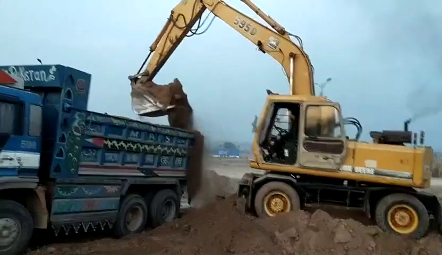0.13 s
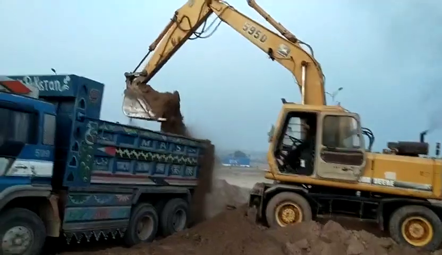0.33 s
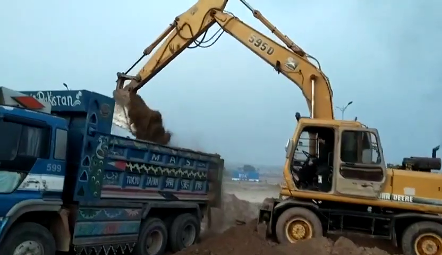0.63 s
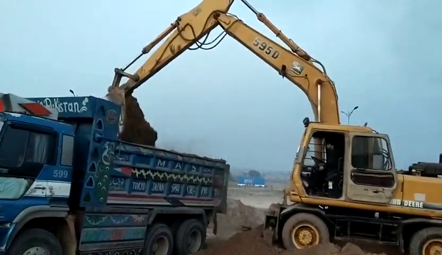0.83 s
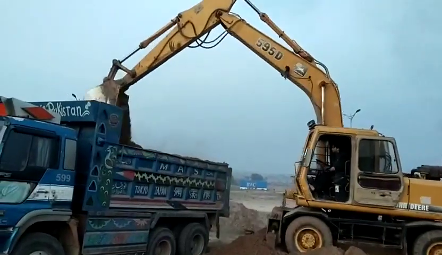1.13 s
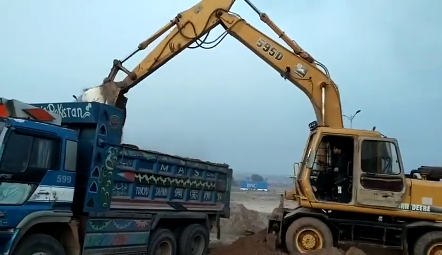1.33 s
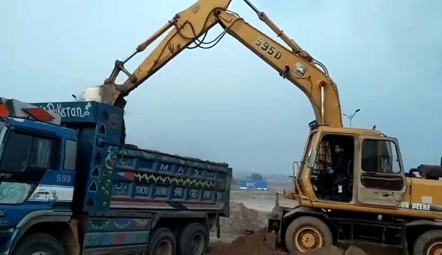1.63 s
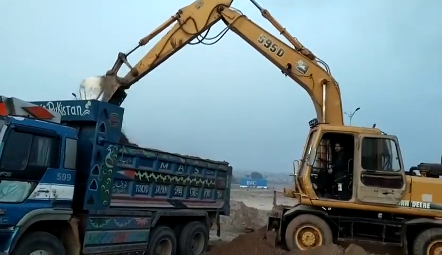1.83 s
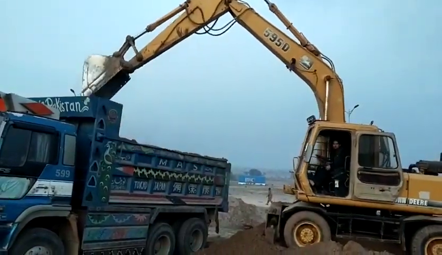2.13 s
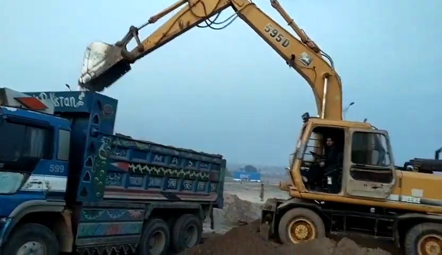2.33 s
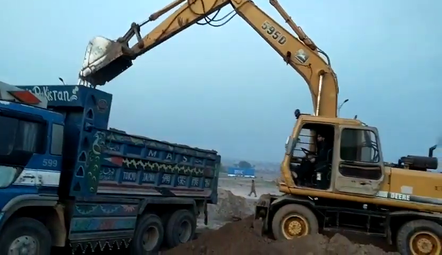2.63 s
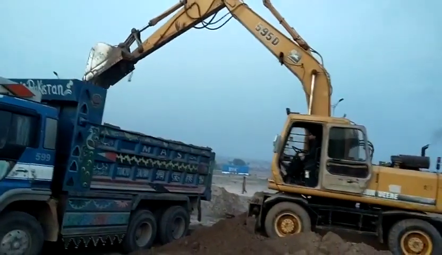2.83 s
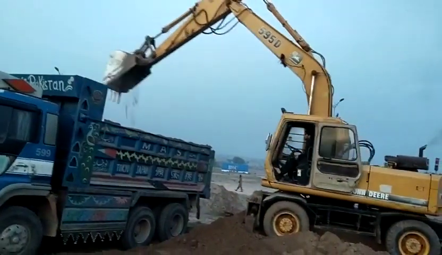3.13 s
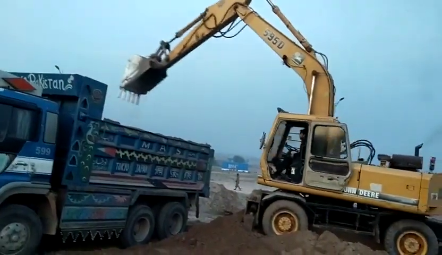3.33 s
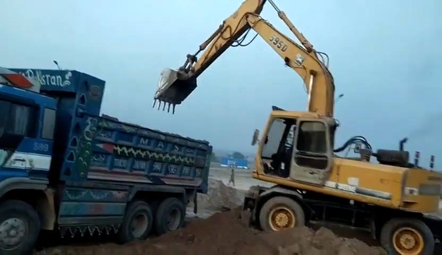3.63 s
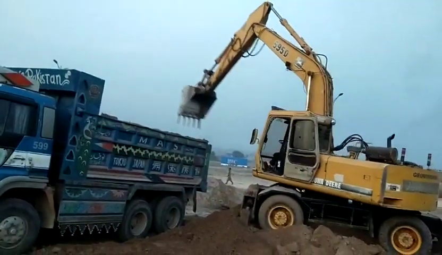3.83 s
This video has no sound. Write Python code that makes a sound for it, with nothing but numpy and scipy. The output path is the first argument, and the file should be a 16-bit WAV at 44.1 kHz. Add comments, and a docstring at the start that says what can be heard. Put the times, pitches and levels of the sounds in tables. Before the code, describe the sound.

A loud excavator diesel roars outdoors, close to the microphone, while soil patters down, the steel bucket clanks and clods thud into a truck bed; then the engine eases and faint hydraulic whines follow the swinging boom.

```python
"""Excavator loading a truck

A diesel engine is heard as harmonics of its firing rate under roar, clatter and hiss that pulse with it.
Soil patters as a random stream of short knocks; the steel bucket clanks and clods thump into the truck
bed, each a sum of decaying modes with a burst of noise. The boom then swings away with a two-partial
hydraulic hum and thin gliding whines. The sound opens with a quick fade-in, in two channels."""
import sys
import numpy as np
from scipy import signal
from scipy.fft import rfft, irfft
from scipy.io import wavfile
from scipy.ndimage import uniform_filter1d

SR = 44100
rng = np.random.default_rng(int(sys.argv[2]) if len(sys.argv) > 2 else 0)


def generate_wav(sig):
    """Save sig (samples, or channels by samples) to the path in sys.argv[1] as 16-bit PCM at SR."""
    pcm = np.round(np.clip(np.atleast_2d(sig).T, -1, 1) * 32767).astype(np.int16)
    wavfile.write(sys.argv[1], SR, pcm)


N = 176400
T = np.arange(N) / SR
HZ = np.fft.rfftfreq(N, 1 / SR)

# Source levels are nominal, ahead of the channel balance and opening gain.
# Colours are relative spectral densities.

# engine firing rate before jitter: t/s, f/Hz
FIRING_RATE = [(.4, 90), (.97, 89), (1.07, 89.6), (2.5, 90.3), (3.6, 89.8), (3.7, 93)]
# exhaust note: t/s, level/dB
EXHAUST = [(.42, -26.5), (.57, -26), (1.0, -25), (1.07, -28), (1.13, -30.5), (1.6, -31), (2.5, -33.5),
           (2.85, -37), (3.25, -37.5), (3.64, -42.5), (3.82, -35.5)]
# exhaust partials: multiple of the firing rate, level/dB
ORDERS = [(1, -0.5), (2, -4), (2.5, -22), (3, -15.5), (3.5, -17.5), (4, -13), (4.5, -25)]
# engine noise: t/s, low roar level/dB, midrange clatter level/dB, treble hiss level/dB
ENGINE_NOISE = [(.43, -26, -28.5, -39.5), (.6, -24, -25.5, -35), (.9, -28, -27, -36),
                (1.09, -28.5, -30.5, -39), (1.14, -30.5, -32.5, -46), (1.35, -32.5, -34.5, -46.5),
                (1.65, -31, -36.5, -47), (2.03, -33, -34, -43.5), (2.25, -34.5, -35.5, -45.5),
                (2.5, -36, -33, -41.5), (2.78, -34.5, -34.5, -44.5), (3.1, -35, -33, -44.5),
                (3.45, -35.5, -33.5, -43), (3.7, -32.5, -32, -43.5), (4, -34, -33, -43)]
# colours of these three noises: f/Hz, level/dB
ROAR_COLOUR = [(20, -21), (42, -26), (62, -10.5), (105, -9.5), (145, -2), (195, 0.5), (250, -4), (300, 1),
               (400, -3.5), (480, -8.5), (700, -14.5), (1500, -41)]
CLATTER_COLOUR = [(150, -52), (400, -17), (600, 0.5), (700, -4), (830, 1), (1100, -2), (1550, -0.5),
                  (2200, -8.5), (2800, -10), (3400, -14.5), (5000, -24), (9000, -46.5)]
HISS_COLOUR = [(1500, -3), (3300, -2), (4400, 1.5), (5700, -2.5), (6300, 4.5), (6900, 4.5), (7700, -4),
               (8700, -7), (12000, -5.5), (15000, -1.5), (16000, -12)]
# relative strength of the firing pulse in roar, clatter, hiss [no unit]
PULSING = [0.16, 0.045, 0.082]
# hydraulic pump hum: t/s, f/Hz, fundamental level/dB, octave level/dB
PUMP = [(1.33, 198, -44, -57.5), (1.55, 199.6, -38.5, -44.5), (1.8, 202, -36.5, -38),
        (2.2, 199.3, -38.5, -58), (2.8, 200, -69, -57), (3.3, 199.5, -67, -41), (3.7, 200, -38, -36.5),
        (3.8, 202, -34.5, -43), (4, 203, -30.5, -47)]
# hydraulic whines: start t/s, end t/s, starting f/Hz, final f/Hz, level/dB
WHINES = [(2.68, 2.9, 2755, 2712, -48), (2.92, 3.17, 2712, 2750, -45.5), (3.12, 3.47, 2715, 2900, -51.5),
          (3.42, 3.66, 810, 825, -45), (3.64, 3.92, 890, 915, -45)]
# sliding soil: t/s, level/dB
SOIL = [(.4, -40.5), (.6, -32.5), (.8, -32), (1.09, -33), (1.17, -42.5), (1.6, -39.5), (2.1, -64)]
# colour of the soil: f/Hz, level/dB
SOIL_COLOUR = [(130, -4), (200, 11.5), (370, 8), (700, 0.5), (1200, 1.5), (2600, 0), (3700, -13),
               (7000, -18), (9000, -22)]
# bucket clanks: t/s, level/dB, favoured f/Hz
CLANKS = [(.912, -16.5, 2360), (.916, -22.5, 1270), (.936, -22, 2000), (1.077, -33, 2840),
          (1.081, -25.5, 1360), (1.095, -20, 2030), (1.108, -19, 2250), (1.113, -13.5, 1280),
          (1.128, -26, 1700), (1.147, -25, 1550), (1.265, -27, 1350), (1.275, -28.5, 2010),
          (1.363, -26.5, 3300), (1.371, -24.5, 1350), (1.383, -25.5, 2000), (1.397, -24, 1663),
          (1.445, -25.5, 1650)]
# bucket modes: f/Hz, level/dB, time to fall 60 dB t60/s
BUCKET_MODES = [(704, -3, 0.25), (1287, 6.5, 0.088), (1618, -2, 0.17), (1716, -10, 0.12), (1733, -4, 0.17),
                (2051, -4, 0.22), (2186, 0, 0.075), (2404, -3, 0.051), (2810, -8, 0.13), (3634, -16, 0.13)]
# colour of the steel contact noise: f/Hz, level/dB
CRUNCH_COLOUR = [(200, -22), (800, -2), (1300, 2), (2300, -3), (3200, -5.5), (5000, -15.5), (15000, -59)]
# clods landing: t/s, level/dB, spectral tilt/(dB per octave)
CLODS = [(.57, -23.5, 6), (.817, -17.5, -16), (1.131, -20.5, 4.5), (1.154, -17.5, -4), (1.4218, -18.5, -7),
         (1.4304, -17, 2), (1.448, -19, -8.5), (1.4612, -15.5, -3), (1.4966, -20, -5.5)]
# truck bed modes: f/Hz, level/dB, t60/s
BED_MODES = [(167, -1.5, 0.13), (200.3, 5.5, 0.3), (231.5, 4, 0.15), (324, -5.5, .12), (459.7, -2, 0.17),
             (556, -8.5, 0.17), (694, -8.5, 0.16), (810, -22, 0.17)]
# colour of the thud noise: f/Hz, level/dB
THUD_COLOUR = [(50, -21), (130, -16), (220, 0), (400, -9), (820, -12), (1300, -40), (5000, -62)]
# likeness of the two channels: f/Hz, correlation [0 to 1]
LIKENESS = [(30, 0.23), (90, 0.87), (300, 1), (600, 0.9), (1200, 0.98), (2500, 0.4), (6000, 0.36),
            (10000, 0.099)]
# channel balance: f/Hz, left minus right level/dB
BALANCE = [(250, 0), (700, -0.5), (1300, -3.5), (2200, -4.5), (3600, 4), (5200, 1.5), (7000, 5.5),
           (9000, 9), (12000, 12.5), (15000, 21)]
# phase by which the engine noise leads on the left: f/Hz, phase/rad
LEAD = [(0, 0.12), (400, 0.53), (900, 1.46), (1650, 2.68), (3400, 8.78), (16000, 38.3)]
# gain at the opening, whose last value then holds: t/s, level/dB
OPENING = [(.372, -86), (.379, -9.5), (.405, -5.5), (.43, 1.5)]

# engine: rms speed jitter (fraction), exhaust waver scale, rms flutter of roar, clatter and hiss
SPEED_JITTER, WAVER_DB, FLUTTER_DB = 0.0033, 1.5, [0.34, 0.1, 1.1]
PATCH_DB, RIPPLE_DB = 1.03, 2  # rms unevenness of noise colour; the ripples weaken below 1 kHz
# hydraulics: rms roughness of the hum (fraction), rms pitch and level wander of the whines
PUMP_ROUGH, WHINE_WOBBLE_HZ, WHINE_WAVER_DB = 0.3, 7, 2
# soil: all grains together, spread of their sizes
GRAINS_PER_S, GRAIN_SPREAD_DB = 2200, 1.7
# stones, large to small; decay time constant in cycles
STONE_LOW_HZ, STONE_HIGH_HZ, STONE_CYCLES = 251, 7030, 3.2
# clanks: noise level and t60, onset time, level of the ringing
CRUNCH_DB, CRUNCH_T60, CONTACT_S, RING_DB = -3, 0.078, 0.0039, -3.5
CLANK_FOCUS_DB, GRIT_DB = 12, 2  # fall one octave or more off the favoured pitch; rms unevenness
# clods: noise level and t60, onset time, level of the bed modes
THUD_DB, THUD_T60, LANDING_S, BED_DB = -4, 0.075, 0.0044, -1
LOAD_LEFT_DB = 2.5  # left minus right, for bucket and truck bed
EDGE_HZ = 15950  # upper band limit


def amp(db):
    """Definition of level: decibels to amplitude ratio."""
    return 10 ** (np.asarray(db) / 20)


def unit(x):
    """Normalisation to an rms of 1."""
    return x / np.sqrt(np.mean(x ** 2) + 1e-20)


def curve(rows, axis=1):
    """Linear interpolation of one column of a time table at every sample."""
    rows = np.array(rows)
    return np.interp(T, rows[:, 0], rows[:, axis])


def read(points, hz):
    """Interpolation of a spectrum table on a logarithmic frequency axis."""
    f, value = np.transpose(points)
    return np.interp(np.log(hz + 1), np.log(f + 1), value)


def tint(x, colour):
    """Linear filtering by spectral multiplication, normalised to rms 1."""
    size = x.shape[-1]
    gain = amp(read(colour, np.fft.rfftfreq(size, 1 / SR)))
    return unit(irfft(rfft(x) * gain, size))


def drift(rate_hz):
    """Random modulation: noise under a Gaussian low-pass, of rms 1."""
    spectrum = rfft(rng.standard_normal(N))
    return unit(irfft(spectrum * np.exp(-(HZ / rate_hz) ** 2), N))


def add(mix, s, sound):
    """Superposition of a sound starting at s seconds, cut at the end of the mix."""
    part = mix[:, round(s * SR):][:, :sound.shape[-1]]
    part += sound[..., :part.shape[1]]


def ports(pair, lead=0):
    """Partial coherence: shares one signal between channels by frequency and lags the right by lead."""
    a, b = rfft(pair)
    same = np.clip(read(LIKENESS, HZ), 0, 1)
    right = same * a + np.sqrt(1 - same ** 2) * b
    return irfft(np.array([a, right * np.exp(-1j * lead)]), N)


def patchy_noise():
    """Nonstationary noise: two noises share quick broad patches and slow narrow ripples of colour."""
    z = signal.stft(rng.standard_normal((2, N)), nperseg=1024)[2]
    quick, slow = rng.standard_normal((2, *z.shape[1:]))
    # axis 0 is frequency, axis 1 is time
    patches = unit(uniform_filter1d(uniform_filter1d(quick, size=7, axis=0), size=7, axis=1))
    ripples = unit(uniform_filter1d(uniform_filter1d(slow, size=2, axis=0), size=70, axis=1))
    ripples *= np.clip(np.fft.rfftfreq(1024, 1 / SR) / 1000, 0, 1)[:, None]
    shaped = z * amp(PATCH_DB * patches + RIPPLE_DB * ripples)
    return signal.istft(shaped, nperseg=1024)[1][:, :N]


def tilted(rows, tilt_db, centre_hz):
    """Spectral tilt per octave about a centre, held beyond two octaves; rows begin with Hz and dB."""
    return [(hz, db + tilt_db * np.clip(np.log2(hz / centre_hz), -2, 2), *rest)
            for hz, db, *rest in rows]


def focused(rows, centre_hz):
    """Selective excitation: attenuates rows of Hz and dB with distance from the favoured pitch."""
    return [(hz, db - CLANK_FOCUS_DB * min(abs(np.log2(hz / centre_hz)), 1), *rest)
            for hz, db, *rest in rows]


def ring(modes, t, phases):
    """Modal superposition: decaying sinusoids of nominal starting rms 1, phases in cycles."""
    hz, db, t60 = np.transpose(modes)[:, :, None]
    partials = amp(db - 60 * t / t60) * np.sin(2 * np.pi * (hz * t + phases))
    return np.sqrt(2) * partials.sum(-2) / np.linalg.norm(amp(db))


def exhaust(turns):
    """Harmonic synthesis: whole and half orders locked to the firing phase, with wavering levels."""
    note = 0
    for k, db in ORDERS:
        level = db + WAVER_DB * min(k - 0.7, 2) * drift(rate_hz=11.6)
        note = note + amp(level) * np.cos(2 * np.pi * (k * turns + rng.random()))
    return np.sqrt(2) * note * amp(curve(EXHAUST))


def engine():
    """Periodic excitation: exhaust orders, and noises amplitude-modulated by each firing."""
    turns = np.cumsum(curve(FIRING_RATE) * (1 + SPEED_JITTER * drift(rate_hz=8))) / SR
    out = exhaust(turns)
    # a jump at each firing, then exponential decay over the cycle
    puff = np.exp(-(turns % 1) / 0.5) * amp(2.2 * drift(rate_hz=23))
    puff = unit(puff - puff.mean())
    flutter = drift(rate_hz=22)
    lead = np.interp(HZ, *np.transpose(LEAD))
    for k, colour in enumerate([ROAR_COLOUR, CLATTER_COLOUR, HISS_COLOUR]):
        pulse = 1 + 0.5 * PULSING[k] * puff
        noise = tint(patchy_noise() * amp(FLUTTER_DB[k] * flutter) * pulse, colour)
        out = out + ports(noise, lead) * amp(curve(ENGINE_NOISE, axis=k + 1))
    return out


def pump():
    """Frequency and amplitude modulation: an unsteady, rough hum of fundamental and octave."""
    phase = 2 * np.pi * np.cumsum(curve(PUMP) * (1 + 0.012 * drift(rate_hz=19))) / SR
    hum = 0
    for k in (1, 2):
        level = curve(PUMP, axis=k + 1) + 1.33 * drift(rate_hz=8)
        hum = hum + np.sqrt(2) * amp(level) * np.sin(k * phase)
    return hum * (1 + PUMP_ROUGH * drift(rate_hz=110))


def whines():
    """Frequency glide: wavering tones that swell and fade as the boom moves."""
    out = 0
    for start, end, from_hz, to_hz, db in WHINES:
        along = np.clip((T - start) / (end - start), 0, 1)
        hz = from_hz + (to_hz - from_hz) * along + WHINE_WOBBLE_HZ * drift(rate_hz=54)
        swell = np.sqrt(2 * abs(np.sin(np.pi * along)))
        level = amp(db + WHINE_WAVER_DB * drift(rate_hz=27.4))
        out = out + swell * level * np.sin(2 * np.pi * np.cumsum(hz) / SR)
    return out


def soil():
    """Shot noise: crumbs and stones leave the bucket as random knocks, each a short decaying tone."""
    out, t = np.zeros((2, N)), T[:SR // 20]
    pitches = np.geomspace(STONE_LOW_HZ, STONE_HIGH_HZ, num=20)
    for hz in pitches:
        size = amp(GRAIN_SPREAD_DB * np.minimum(rng.exponential(1, N), 4))
        hits = rng.random(N) < GRAINS_PER_S / len(pitches) / SR
        signs = rng.choice([-1, 1], (2, N))
        knock = hz * np.exp(-hz * t / STONE_CYCLES) * np.sin(2 * np.pi * hz * t)
        out += signal.oaconvolve(size * hits * signs, knock[None])[:, :N]
    return ports(tint(out, SOIL_COLOUR)) * amp(curve(SOIL))


def bucket():
    """Impact excitation: gritty steel contacts ring the bucket modes around a favoured pitch."""
    out, t = np.zeros((2, N)), T[:SR // 2]
    for s, db, hz in CLANKS:
        steel = ring(focused(BUCKET_MODES, hz), t, rng.random((2, len(BUCKET_MODES), 1)))
        scrape = rng.standard_normal((2, len(t))) * amp(GRIT_DB * drift(rate_hz=470)[:len(t)])
        decay = amp(CRUNCH_DB - 60 * t / CRUNCH_T60)
        crunch = tint(scrape, focused(CRUNCH_COLOUR, hz)) * decay
        onset = np.minimum(t / CONTACT_S, 1)
        add(out, s, amp(db) * onset * (amp(RING_DB) * steel + crunch))
    return ports(out)


def clods():
    """Impact on a resonant plate: lumps of soil land with a dull thud and boom in the truck bed."""
    out, t = np.zeros((2, N)), T[:SR // 2]
    for s, db, tilt in CLODS:
        boom = ring(tilted(BED_MODES, tilt, centre_hz=230), t, phases=0)
        noise = rng.standard_normal((2, len(t)))
        decay = amp(THUD_DB - 60 * t / THUD_T60)
        thud = tint(noise, tilted(THUD_COLOUR, tilt, centre_hz=230)) * decay
        onset = np.minimum(t / LANDING_S, 1)
        add(out, s, amp(db) * onset * (amp(BED_DB) * boom + thud))
    bass_cut = signal.butter(2, 100, "high", fs=SR, output="sos")
    return ports(signal.sosfilt(bass_cut, out))


def scene():
    """Superposition of the machine and its load, with bucket and clods a little to the left."""
    left = amp([[LOAD_LEFT_DB / 2], [-LOAD_LEFT_DB / 2]])
    return engine() + pump() + whines() + soil() + left * (bucket() + clods())


def record(dry):
    """Power-preserving channel balance by frequency, then the opening gain and a low-pass filter."""
    ratio = amp(read([(110, -0.3)] + BALANCE, HZ))  # left over right
    sides = np.array([ratio, np.ones_like(ratio)]) * np.sqrt(2 / (1 + ratio ** 2))
    balanced = irfft(rfft(dry) * sides, N)
    heard = balanced * amp(curve(OPENING)) * (T > OPENING[0][0])  # silent before the first row
    low_pass = signal.firwin(511, EDGE_HZ, window=("kaiser", 9), fs=SR)
    return signal.oaconvolve(heard, low_pass[None], "same")


dry = scene()
out = record(dry)
generate_wav(out)
```